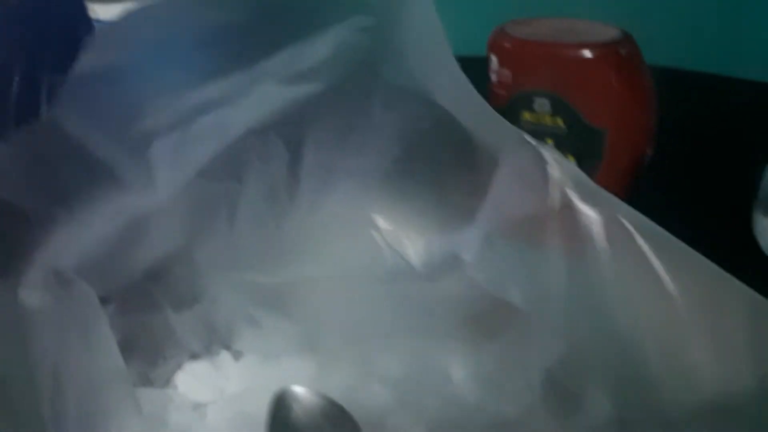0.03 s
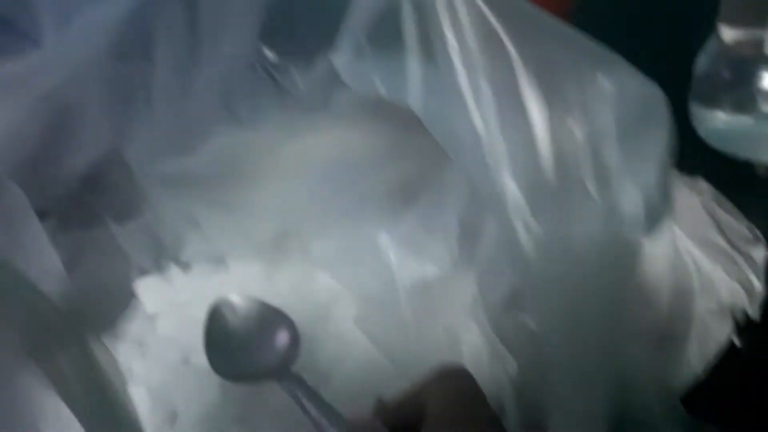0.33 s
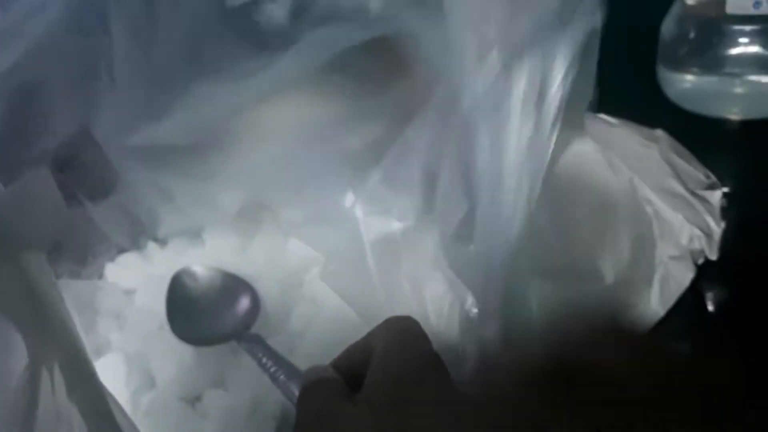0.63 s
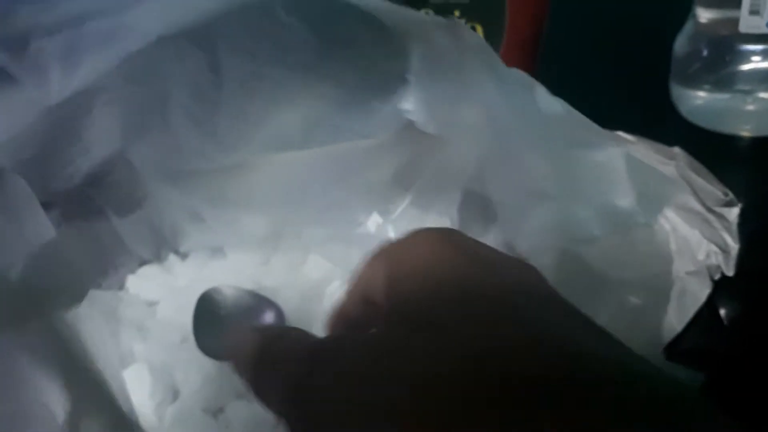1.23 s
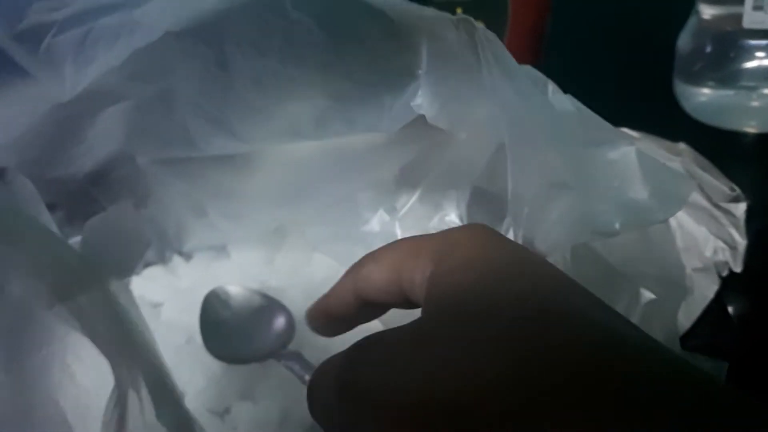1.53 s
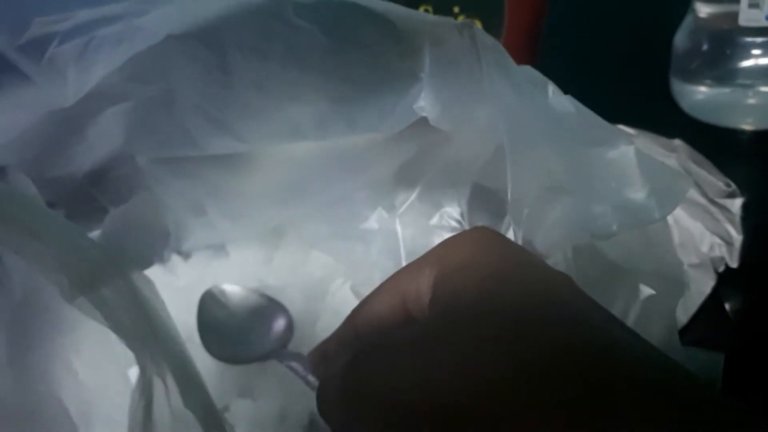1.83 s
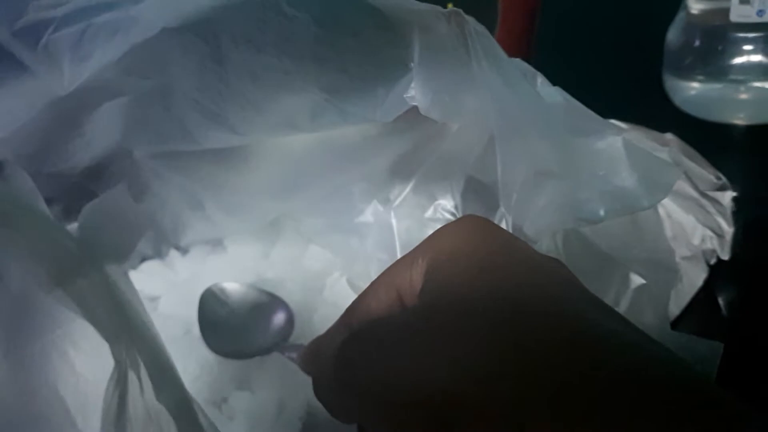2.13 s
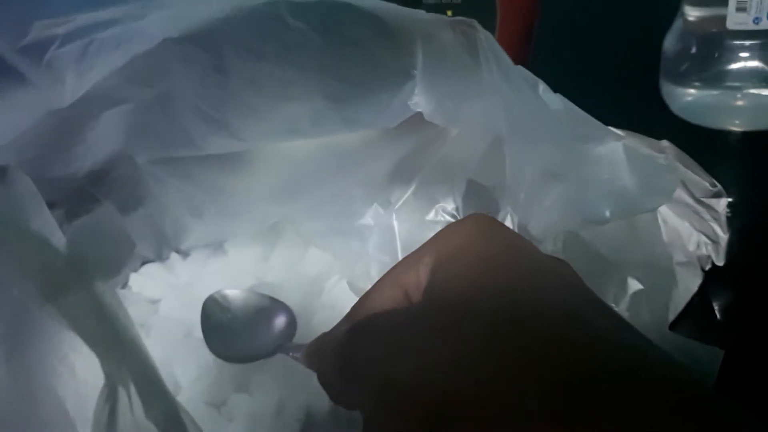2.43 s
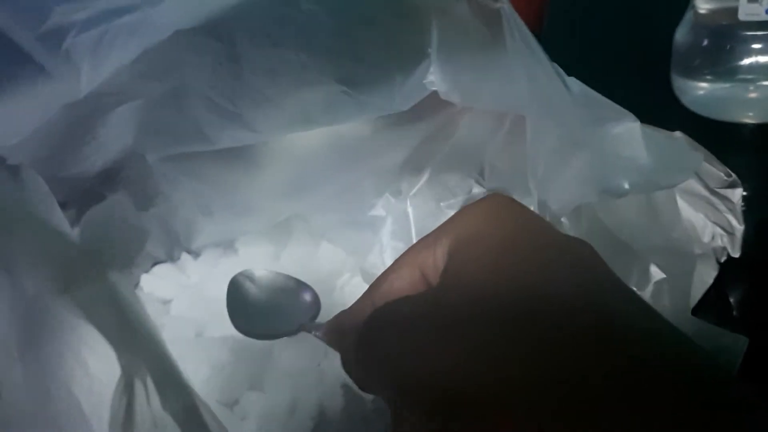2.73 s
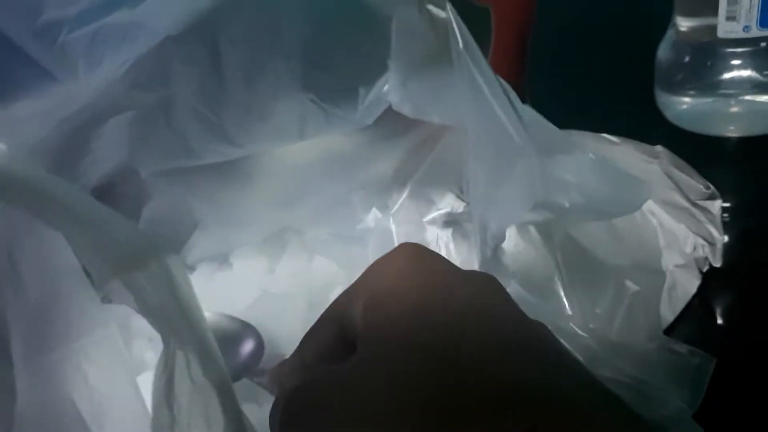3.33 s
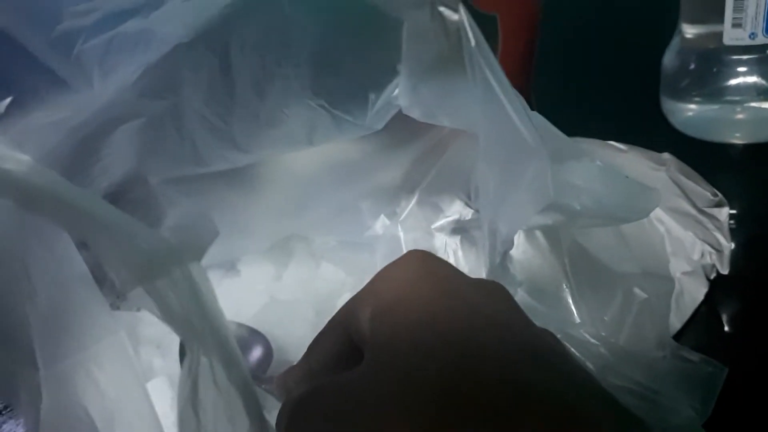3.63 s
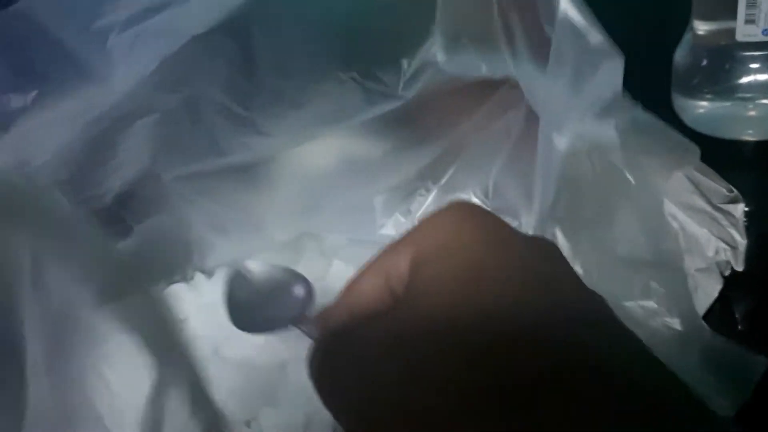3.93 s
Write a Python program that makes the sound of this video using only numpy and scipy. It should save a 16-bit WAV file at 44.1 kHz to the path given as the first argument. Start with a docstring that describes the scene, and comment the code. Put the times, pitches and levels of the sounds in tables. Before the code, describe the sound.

Close to the microphone in a small room, a metal spoon rasps against dry ice, climbing to a shrill squeal. It stops, a plastic bag rustles lightly, and a second, shorter screech drops in pitch.

```python
"""A small room, a stereo microphone close to a plastic bag of dry ice. A metal spoon is pressed on the
ice: escaping gas lifts it and lets it fall hundreds of times a second. Uneven taps make a harsh rasp,
even ones lock into a squeal. The taps ring the spoon's modes. Underneath, the heap rumbles and knocks
in the room's steady hush; between strokes the bag crackles."""
import sys
import numpy as np
from scipy import signal
from scipy.fft import rfft, irfft, next_fast_len
from scipy.io import wavfile
from scipy.ndimage import uniform_filter1d, map_coordinates

SR = 44100
rng = np.random.default_rng(int(sys.argv[2]) if len(sys.argv) > 2 else 0)


def transcribe(u):
    """Save the signal u as a 16-bit wav file named by the first command-line argument.

    u: samples, shape (n,) or (channels, n), limited to [-1, 1]; the rate is SR.
    q: integer samples, one column per channel.
    """
    v = np.clip(np.atleast_2d(u).T, -1, 1)
    q = np.round(v * 32767).astype(np.int16)
    wavfile.write(sys.argv[1], SR, q)


N = 176400
FFT_SIZE = next_fast_len(N + SR // 4)
HZ, T = np.fft.rfftfreq(FFT_SIZE, 1 / SR), np.arange(N) / SR


def amp(db):
    """Decibels to gain."""
    return 10 ** (np.asarray(db) / 20)


def unit(x):
    """x at rms 1."""
    return x / np.sqrt(np.mean(x ** 2) + 1e-20)


def levelled(x, samples, floor=1e-12):
    """x held near rms 1 over a sliding window."""
    return x / np.sqrt(np.abs(uniform_filter1d(x ** 2, size=samples)) + floor)


def over_hz(points):
    """(Hz, value) points joined on a log axis."""
    hz, values = np.transpose(points)
    return np.interp(np.log(HZ + 1), np.log(hz + 1), values)


def over_time(points):
    """(seconds, value) points joined sample by sample."""
    return np.interp(T, *np.transpose(points))


def wobble(rate):
    """A smooth random curve, rate knots a second."""
    return map_coordinates(rng.standard_normal(4096), [T * rate], mode="wrap")


def filtered(x, response):
    """x through a frequency response."""
    return irfft(rfft(x, FFT_SIZE) * response, FFT_SIZE)[..., :N]


def causal(gain):
    """The response with this gain that rings only after a tap."""
    cepstrum = irfft(np.log(np.maximum(gain, 1e-6)), FFT_SIZE)
    cepstrum[1:FFT_SIZE // 2] *= 2
    cepstrum[FFT_SIZE // 2 + 1:] = 0
    return np.exp(rfft(cepstrum))


def lowpass(hz, order):
    """Gain of a low-pass."""
    return 1 / np.sqrt(1 + (HZ / hz) ** (2 * order))


def reflections(x, t60):
    """Diffuse reflections of x, different left and right, falling 60 dB in t60 seconds."""
    t = T[:SR // 3]
    tail = rng.standard_normal((2, len(t))) * amp(-60 * t / t60) * (t > .001)
    tail /= np.linalg.norm(tail, axis=1, keepdims=True)
    return signal.fftconvolve(x, tail, axes=1)[:, :N]


# Room tone all around the microphone. Each row: frequency in Hz, relative level in dB.
HUSH_TONE = [(30, -3), (200, -28.5), (450, -7.5), (900, 3.5), (1300, -8), (3100, -6), (5500, -12),
             (8000, -11.5), (15500, -20)]


def room_hush():
    """Steady, wide noise, only partly shared by left and right."""
    noise = rng.standard_normal(N) + 1.8 * rng.standard_normal((2, N))
    return unit(filtered(noise, amp(over_hz(HUSH_TONE))))


# The heap shifting, dead centre. Each row: time in seconds, level in dB.
RUMBLE_LEVEL = [(0,-57.5),(1.09,-54),(1.14,-44.5),(1.22,-52),(2.58,-64.5),(2.65,-55),(2.74,-63),(3.05,-61),(3.29,-52.5),(3.46,-52),(3.53,-58)]
# Colour of its rumble. Each row: frequency in Hz, relative level in dB.
RUMBLE_TONE = [(30, -9), (115, -1.5), (134, 7.5), (160, -5), (205, 6), (250, 1), (300, -2.5), (420, -9),
               (700, -11), (2000, -56)]
# Knocks in the heap. Each row: start in seconds, level in dB.
KNOCKS = [(3.032, -37), (3.582, -38)]


def ice_heap(knock_hz=691.6, knock_t60=0.043):
    """The ice chunks shift with a low rumble and two soft, damped knocks."""
    level = amp(over_time(RUMBLE_LEVEL) + 1.7 * wobble(40))
    out = level * unit(filtered(rng.standard_normal(N), amp(over_hz(RUMBLE_TONE))))
    for start, db in KNOCKS:
        age = np.maximum(T - start, 0)
        attack = 1 - np.exp(-age / 0.0017)
        out += attack * amp(db - 60 * age / knock_t60) * np.sin(2 * np.pi * knock_hz * age)
    return out


# Snaps of bag and ice, close by. Each row: start in seconds, relative level in dB.
SNAPS = [(2.4071, -45), (2.483, -44.5), (2.5795, -53), (2.605, -41.5), (2.6245, -44.5), (2.6493, -38.5),
         (2.6795, -43.5), (3.7912, -49.5), (3.896, -54)]
# Rustles of the bag. Each row: centre in seconds, half length in seconds, level in dB.
RUSTLES = [(2.651, 0.057, -48.5), (2.828, 0.028, -52), (3.68, 0.015, -68), (3.852, 0.023, -56)]
# Colour of the plastic. Each row: frequency in Hz, relative level in dB.
BAG_TONE = [(200, -1), (1200, -6), (1900, 0), (3000, -1), (5800, -10), (8000, -7.5), (15500, -10)]


def plastic_bag(snap_t60=0.016, snap_gain_db=10, crinkles_per_s=620):
    """The bag gives single snaps and short clouds of tiny crinkles."""
    decays = sum(amp(db - 60 * np.abs(T - start) / snap_t60) * (T >= start) for start, db in SNAPS)
    snaps = amp(snap_gain_db) * decays * rng.standard_normal(N)
    ticks = (rng.random(N) < crinkles_per_s / SR) * rng.standard_normal(N)
    crinkles = unit(ticks) + rng.standard_normal(N) / 2
    swell = sum(amp(db) * np.exp(-((T - centre) / half) ** 2 / 2) for centre, half, db in RUSTLES)
    return filtered(snaps + swell * crinkles, causal(unit(amp(over_hz(BAG_TONE)))))


# The spoon bouncing on the gas, phase by phase. Each row: time in seconds, taps a second.
RASP_RATE = [(0, 770), (.045, 940), (.056, 670), (.11, 630), (.17, 784), (.3, 730), (.7, 850), (1.3, 1397),
             (1.8, 1710)]
SQUEAL_RATE = [(1.859,1617),(1.942,1560),(1.99,1611),(2.055,1622),(2.064,1730),(2.177,1796),(2.219,1766),(2.25,1674),(2.31,1696),(2.391,1628)]
SHOVE_RATE = [(3.048, 1701), (3.16, 1706), (3.27, 897), (3.5, 889.6)]
# Unevenness of the taps. Each row: time in seconds, timing spread as a share of a period.
TAP_SCATTER = [(0, 0.17), (.06, 0.083), (.11, 0.084), (.2, 0.33), (1.78, 0.43), (1.875, 0.37),
               (1.89, 0.024), (1.975, 0.039), (1.99, 0.22), (2.05, 0.23), (2.07, 0.023), (2.21, 0.018),
               (2.245, 0.15), (2.28, 0.035), (2.39, 0.031), (3.1, 0.3048)]


def gas_taps(wander=0.0059, force_db=6, flutter_db=3.5, octave_drop_s=(2.062, 2.232)):
    """Gas lifts and drops the spoon once a period; uneven timing brings uneven force and flutter."""
    rate = over_time([*RASP_RATE, *SQUEAL_RATE, *SHOVE_RATE]) * (1 + wander * wobble(250))
    scatter = over_time(TAP_SCATTER)
    cycles = np.cumsum(rate) / SR
    tap = np.arange(1, int(cycles[-1]))
    lateness, strength = rng.standard_normal((8192, 2))[tap].T
    spread = np.interp(tap, cycles, scatter)
    landing = np.interp(tap + spread * lateness, cycles, np.arange(N))
    force = amp(force_db * spread * strength)
    skipping = (landing > octave_drop_s[0] * SR) & (landing < octave_drop_s[1] * SR)
    force *= np.where(skipping, tap % 2, 1)  # every second tap is missed: an octave down
    # A windowed sinc lets each tap land between samples.
    samples = landing.astype(int)[:, None] + np.arange(-7, 9)
    offset = samples - landing[:, None]
    pulses = force[:, None] * np.sinc(offset) * np.cos(np.pi * offset / 16) ** 2
    taps = np.bincount(np.clip(samples, 0, N - 1).ravel(), pulses.ravel(), N)
    return -levelled(taps, 1500, floor=1e-9) * amp(flutter_db * scatter * wobble(110))


# Pressure on the spoon, heard as loudness. Each row: time in seconds, relative level in dB.
PRESSURE = [(0,-41.5),(.048,-43.5),(.058,-34.5),(.52,-34.5),(.68,-31.5),(.8,-35),(1.13,-30),(1.18,-34),(1.37,-29),(1.49,-30),(1.51,-48),(1.546,-45),(1.552,-28.5),(1.568,-31.5),(1.578,-52),(1.61,-48),(1.616,-30),(1.76,-28),(1.878,-32),(1.887,-39),(1.98,-43.5),(1.99,-35),(2.16,-31.5),(2.24,-34.5),(2.4,-61.5),(3.025,-58.5),(3.05,-37.5),(3.11,-53),(3.13,-37),(3.23,-27.5),(3.328,-44.5),(3.337,-31),(3.44,-29),(3.48,-35),(3.5,-46),(3.6,-64.5)]
# Bite of the taps: sharp ones are bright and whistle. Each row: time in seconds, whistle gain in dB.
BITE = [(0,-10),(.07,-5),(.28,1.5),(.68,-6),(.92,-4),(1.14,-0.5),(1.18,-13),(1.23,4),(1.42,0.5),(1.53,-8.5),(1.66,-2.5),(1.88,-6),(1.895,-23),(1.975,-29),(1.99,-14.5),(2.13,2),(2.23,0),(2.33,-9.5),(3.11,3.5),(3.13,1),(3.225,5.5),(3.27,-6),(3.44,-8.5),(3.5,-17)]
# The spoon's modes. Each row: frequency in Hz, width in Hz, strength in dB.
SPOON_MODES = [(853.6, 36, 9.5), (1648, 99, 9.5), (2588, 15, -3.5), (2630, 144, 1.5), (3283, 58, 2),
               (5256, 327, 15), (6800, 20, 17), (9390, 27, 15), (10730, 43, 11.5), (12160, 15, 15)]
# Its two whistling modes. Each row: frequency in Hz, width in Hz, gain in dB, left over right in dB.
WHISTLE_MODES = [(14225, 80, 0, 3), (14950, 90, 0, -4)]


def spoon_stroke(taps, start, end, tone, treble_db, whistles_db):
    """The taps sound through the contact and the spoon's modes, and set two high modes whistling."""
    bite_db = over_time(BITE)
    gate = uniform_filter1d(1. * ((T >= start) & (T < end)), size=200)

    def ring(gain):
        return gate * levelled(filtered(taps, causal(gain)), 1800)

    mode_power = sum(amp(2 * db) / (1 + (2 * (HZ - hz) / width) ** 2) for hz, width, db in SPOON_MODES)
    bass_cut = HZ ** 2 / (HZ ** 2 + 130 ** 2)
    body = amp(over_hz(tone)) * np.sqrt(1 + mode_power) * bass_cut
    low_band = lowpass(hz=4730, order=8)
    high_band = np.sqrt(1 - low_band ** 2) * lowpass(hz=13440, order=12)
    rasp = amp(1) * ring(body * low_band)
    treble = amp(1.5 + treble_db + 0.63 * bite_db) * ring(body * high_band)
    out = (rasp + treble) * np.ones((2, 1))
    for (hz, width, db, pan_db), whistle_db in zip(WHISTLE_MODES, whistles_db):
        whistle = ring((HZ / hz) ** 2 / np.hypot(1, 2 * (HZ - hz) / width))
        pan = amp([[pan_db / 2], [-pan_db / 2]])
        flutter_db = 3.5 * wobble(30.33)
        out += pan * amp(db + whistle_db + bite_db + flutter_db) * whistle
    return amp(over_time(PRESSURE)) * out


# Colours of metal on ice, heard close up. Each row: frequency in Hz, relative level in dB.
PRESS_TONE = [(400, -16.5), (650, -9), (1100, -17), (2300, -1), (3100, -2), (3800, -8.5), (6000, -14),
              (8000, -2.5), (10300, -13), (13000, -1.5)]
SCRAPE_TONE = [(400, -9.5), (1100, -15), (1800, -1), (3000, -1), (4100, -4.5), (6300, -16), (8300, -5),
               (13000, -4.5)]
SCREECH_TONE = [(400, -9), (1300, -11), (1850, 3.5), (2300, 0.5), (3400, 6), (6500, -11), (8300, 6.5),
                (9200, -3), (13000, 4)]
SQUEAL_TONE = [(800, -17), (1500, -11.5), (1780, -7.5), (2300, -8), (3100, -5.5), (4400, -2.5), (4750, -16),
               (7400, -8.5), (8050, 9.5), (8900, -4), (13000, -2.5)]
SHOVE_TONE = [(400, -3), (750, -1), (1150, -4), (1750, 2), (2300, -2.5), (2700, 7), (3800, 1.5),
              (6000, -13.5), (13000, -1.5)]
# The strokes. Each row: start and end in seconds, colour, treble trim in dB, both whistle trims in dB.
STROKES = [(0, .6, PRESS_TONE, -3.5, (0, 2.5)), (.6, 1.53, SCRAPE_TONE, -1, (0, -2)),
           (1.53, 1.885, SCREECH_TONE, 0, (0, -7)), (1.885, 2.4, SQUEAL_TONE, 1, (0, -10)),
           (3, 3.27, SHOVE_TONE, -8.5, (0, -24)), (3.27, 3.7, SHOVE_TONE, -5.5, (0, 7))]
# The spoon's balance at the microphone. Each row: frequency in Hz, left over right in dB.
SPOON_BALANCE = [(300, -1.5), (900, 0), (1700, -2.5), (3000, -7), (5000, 7.5), (9000, -8), (13000, 1.5)]


def spoon(pure_start_s=2.235, pure_fade_s=2.335, pure_db=-37, fade_db_per_s=400):
    """The spoon chatters through six strokes on the ice; the squeal thins to its bare fundamental."""
    taps = gas_taps()
    strokes = sum(spoon_stroke(taps, *row) for row in STROKES)
    onset = np.clip((T - pure_start_s) / 0.015, 0, 1)
    level = amp(pure_db - fade_db_per_s * np.maximum(T - pure_fade_s, 0))
    fundamental = onset * level * np.sin(2 * np.pi * np.cumsum(over_time(SQUEAL_RATE)) / SR)
    balance = amp(over_hz(SPOON_BALANCE) * np.array([[.5], [-.5]]))
    return filtered(strokes + fundamental, balance)


def scene():
    """Close up, the heap, with spoon and bag widened by reflections; behind, the room and its hush."""
    near = spoon() + plastic_bag()
    width = amp(-3.5) * reflections(near, t60=0.039)[0] * np.array([[1], [-1]])
    near = near + width + ice_heap()
    hush = amp(-55.5) * room_hush()
    return near + amp(-8) * reflections(near, t60=0.17) + hush


def record(dry, top_hz=15800):
    """The microphone chain passes nothing above top_hz."""
    return filtered(dry, HZ < top_hz)


dry = scene()
out = record(dry)
transcribe(out)
```